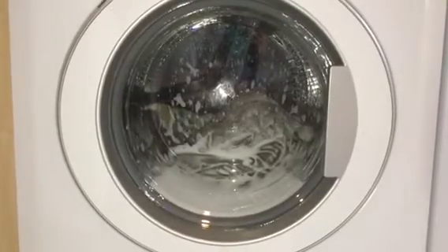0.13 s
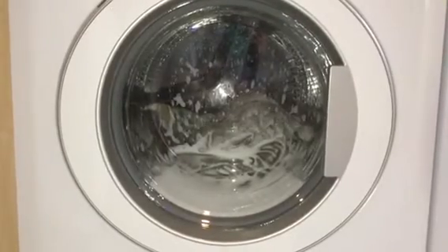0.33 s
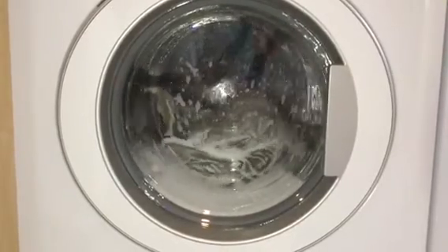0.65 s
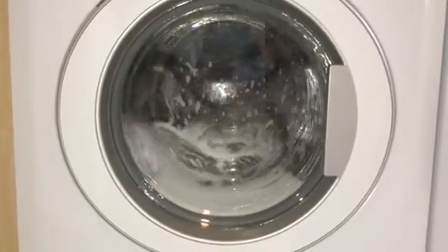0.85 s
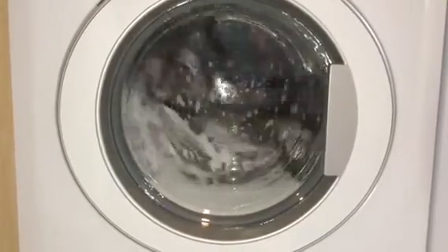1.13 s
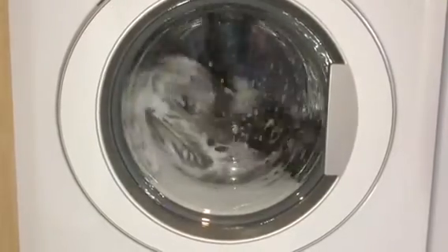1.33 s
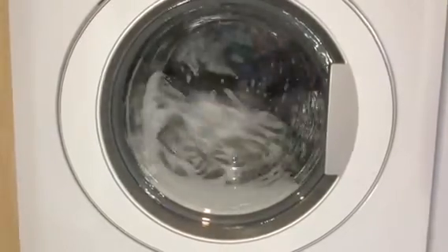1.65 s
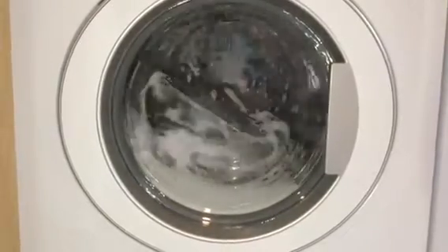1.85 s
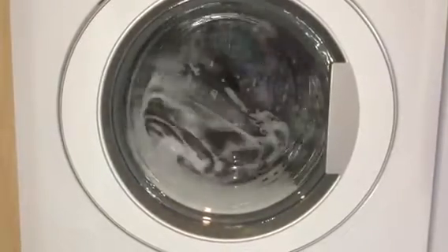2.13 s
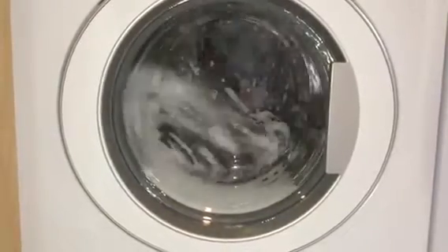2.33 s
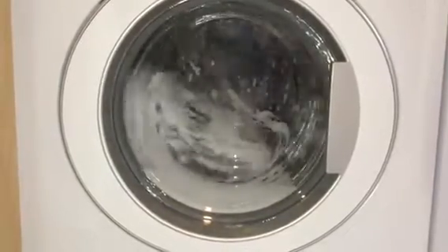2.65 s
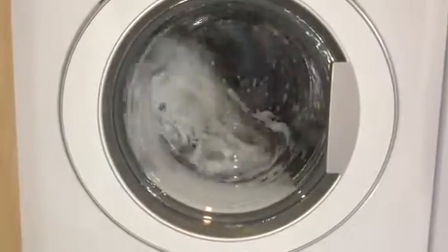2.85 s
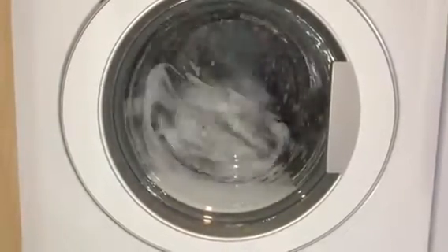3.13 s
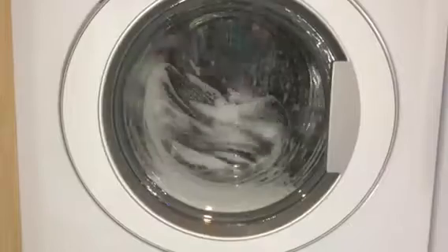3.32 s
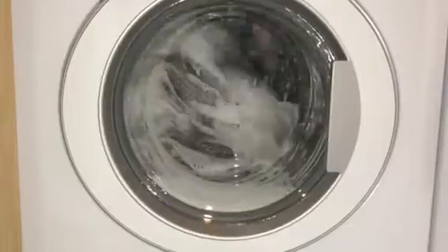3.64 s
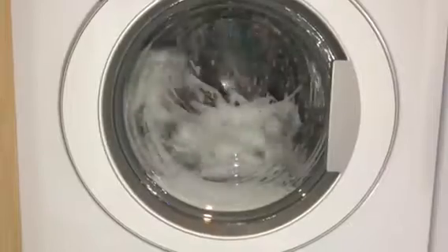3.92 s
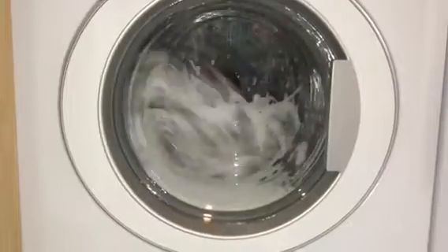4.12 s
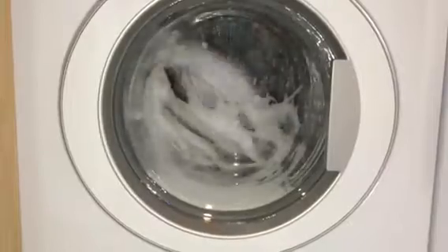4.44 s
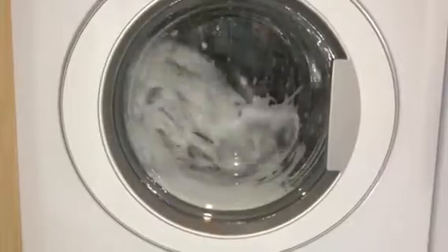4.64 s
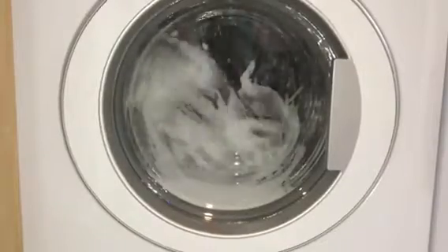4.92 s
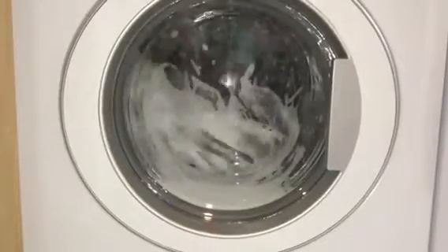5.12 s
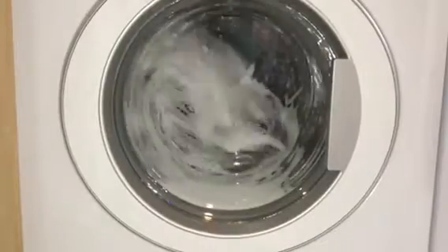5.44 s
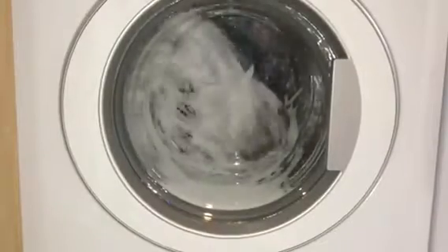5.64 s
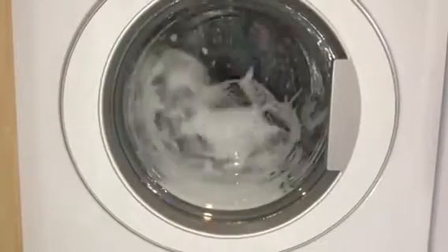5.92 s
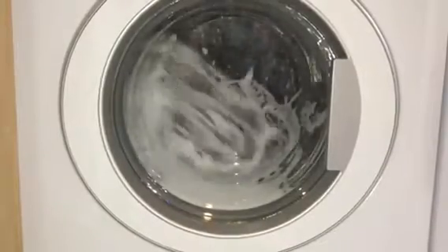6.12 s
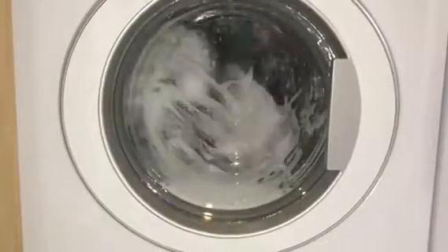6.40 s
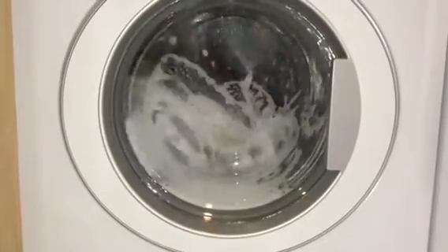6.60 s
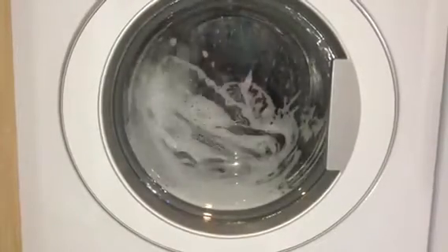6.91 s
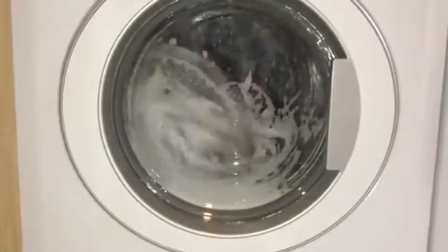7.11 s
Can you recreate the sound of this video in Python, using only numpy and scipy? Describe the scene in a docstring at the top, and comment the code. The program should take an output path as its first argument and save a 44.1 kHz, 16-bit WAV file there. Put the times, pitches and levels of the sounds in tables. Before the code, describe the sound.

A front-loading washing machine starts turning a heavy wet load, with quiet ticks, then irregular hollow thuds, wet slaps and sloshing in a small hard room.

```python
"""Knocks of a wet load in a front-loading washing machine, at the start of a wash turn in a small hard room.
Each fall is a cluster of impacts that excites damped drum and door modes, a cabinet swing and a wet smack.
Thumps are decaying tub oscillations, creaks are harmonics of uneven slips, gulps and drips are gliding notes.
Splashes, sprays and churning are shaped noise; patter and trickle are random trains of short rising notes.
A banded echo, room rumble and microphone hiss lie beneath; the microphone is close to the machine."""
import sys
import numpy as np
from scipy import signal
from scipy.fft import rfft, irfft
from scipy.io import wavfile
from scipy.ndimage import uniform_filter1d

SR = 44100
rng = np.random.default_rng(int(sys.argv[2]) if len(sys.argv) > 2 else 0)


def output_pcm(signal):
    """Save a mono or channel-first signal as 16-bit PCM at the path in sys.argv[1].

    Samples are clipped to [-1, 1] before scaling.
    """
    pcm = np.clip(np.atleast_2d(signal).T, -1, 1) * 32767
    wavfile.write(sys.argv[1], SR, np.round(pcm).astype(np.int16))


N = 320166


def gain_of(db):
    """Level law: decibels to amplitude."""
    return 10 ** (np.asarray(db) / 20)


def evened(x):
    """Power normalization: scales to rms 1."""
    return x / np.sqrt(np.mean(x ** 2) + 1e-20)


def peaked(x):
    """Peak normalization: scales to peak 1."""
    return x / (abs(x).max() + 1e-20)


def blow(x):
    """Energy normalization: scales a short sound to the energy of 10 ms at rms 1."""
    return x * np.sqrt(SR / 100) / (np.linalg.norm(x) + 1e-20)


def read(points, hz):
    """Interpolation of a table on a logarithmic frequency axis."""
    f, value = np.transpose(points)
    return np.interp(np.log(hz + 1), np.log(f + 1), value)


def add(mix, s, sound):
    """Superposition: adds a sound at a moment."""
    part = mix[round(s * SR):][:len(sound)]
    part += sound[:len(part)]


def coloured(x, spectrum):
    """Linear filtering: weights the components of a signal by a spectrum."""
    weights = gain_of(read(spectrum, np.fft.rfftfreq(len(x), 1 / SR)))
    return irfft(rfft(x) * weights, len(x))


def slow_random(shape, size):
    """Low-pass random modulation: white noise averaged twice over size samples, at rms 1."""
    once = uniform_filter1d(rng.standard_normal(shape), size=size)
    return evened(uniform_filter1d(once, size=size))


def random_patches(shape, bands, frames):
    """Correlated fluctuation: random values averaged over neighbouring bands and frames, at rms 1."""
    across = uniform_filter1d(rng.standard_normal(shape), size=bands, axis=0)
    return evened(uniform_filter1d(across, size=frames, axis=1))


def fluttering(shape):
    """Random amplitude modulation: a quick tremble that blurs a note."""
    return 1 + .55 * slow_random(shape, 70)


def noise(spectrum, patchy_db, flicker_db, size=512):
    """Modulated noise: random short-time spectra with drifting patches and a flicker shared by all bands."""
    shape = size // 2 + 1, 4 * N // size + 5
    a, b = rng.standard_normal((2, *shape))
    patches = random_patches(shape, 4, 12)
    flicker = evened(uniform_filter1d(rng.standard_normal(shape[1]), size=10))
    z = (a + 1j * b) * gain_of(patchy_db * patches + flicker_db * flicker)
    modulated = signal.istft(z, nperseg=size, noverlap=3 * size // 4)[1][:N]
    return evened(coloured(modulated, spectrum))


def patchy(x):
    """Time-frequency modulation: breaks a hiss into narrow patches that come and go."""
    z = signal.stft(x, nperseg=256)[2]
    depth_db = 5
    z *= gain_of(depth_db * random_patches(z.shape, 2, 7))
    return signal.istft(z, nperseg=256)[1][:len(x)]


# Room noise and microphone hiss spectra: pitch_hz [Hz], level_db [dB per Hz]
AIR_SPECTRUM = [(12, -47), (20, -12), (85, 0), (1100, -7), (1570, -15), (1670, -9), (1970, -12.5),
                (2430, -15.5), (3000, -21.5), (3900, -26), (6600, -120)]
HISS_SPECTRUM = [(1500, -16), (3000, -2.5), (5000, -3), (7000, -5), (9000, -4), (11000, -5.5), (13500, -6),
                 (15000, -14)]
AIR_DB, HISS_DB, WHINE_DB, WHINE_HZ = -82, -88.5, -103, 9000


def quiet():
    """Stationary noise floor: room noise, microphone hiss and a faint electric whine of narrow-band noise."""
    whine_band = [(WHINE_HZ - 25, -40), (WHINE_HZ, 0), (WHINE_HZ + 25, -40)]
    whine = evened(coloured(rng.standard_normal(N), whine_band))
    hiss = noise(HISS_SPECTRUM, patchy_db=1.5, flicker_db=1.0)
    air = noise(AIR_SPECTRUM, patchy_db=1.5, flicker_db=.6)
    return gain_of(AIR_DB) * air + gain_of(HISS_DB) * hiss + gain_of(WHINE_DB) * whine


# Reverberation time of the room: pitch_hz [Hz], t60_s [s]
ROOM_T60 = [(60, 0.65), (250, 0.27), (700, 0.39), (1100, 0.5), (1600, 0.51), (2500, 0.33), (4000, 0.67),
            (8000, 0.25)]
# Strength of the echo: pitch_hz [Hz], level_db [dB]
ECHO_COLOUR = [(40, -34.5), (100, -3.5), (170, 9), (250, 8), (380, 2.5), (600, -4.5), (1500, -3.5),
               (2300, -6), (4000, -9), (12000, -4)]


def room(x):
    """Reverberation: sparse taps of random sign, each band decaying at its own rate; three tails take turns."""
    out, turn = np.zeros(N), np.pi * np.arange(N) / SR * 1.7
    for k in range(3):
        taps, slots = np.zeros(SR), np.arange(400, SR - 20, 20)
        taps[slots + rng.integers(0, 20, len(slots))] = rng.choice([-1., 1.], len(slots))
        hz, t, z = signal.stft(taps, SR, nperseg=512)
        t60 = read(ROOM_T60, hz)[:, None]
        z *= gain_of(read(ECHO_COLOUR, hz)[:, None] - 60 * t / t60)
        z *= np.sqrt(20 * 6 * np.log(10) / SR / t60)  # energy 1 before the colour
        z *= gain_of(0.49 * random_patches(z.shape, 4, 3))  # random unevenness of the tail
        tail = signal.istft(z, SR, nperseg=512)[1]
        share = np.sqrt(2 / 3) * np.cos(turn + k * np.pi / 3)  # the three powers sum to 1
        out += signal.fftconvolve(x * share, tail)[:N]
    return out


# Churning water and cloth: start_s [s], wash_db [dB], rumble_db [dB]
CHURN_LEVELS = [(0.0, -83, -85.5), (0.69, -77, -69), (0.97, -72.5, -69.5), (1.47, -71, -83.5),
                (1.58, -58, -62), (1.66, -51, -65), (1.78, -66.5, -56), (2.04, -63, -70), (2.75, -62, -67),
                (3.07, -52, -63.5), (3.5, -59.5, -72), (3.75, -49, -57), (4.29, -59.5, -66),
                (4.83, -54.5, -55.5), (4.99, -59, -69.5), (5.24, -55, -55), (5.4, -59, -76),
                (5.84, -58.5, -57), (6.132, -56, -63.5), (7.26, -57.5, -66)]
# Spectra of wash, fine splashing and deep rumble: pitch_hz [Hz], level_db [dB per Hz]
WASH_SPECTRUM = [(59, -34.5), (100, -6.5), (220, -1.5), (255, 3), (327, -11), (451, -9), (486, -15),
                 (605, -8.5), (966, -20), (1190, -26.5), (1710, -38), (2320, -39.5), (3300, -53),
                 (4290, -94), (7260, -120)]
FIZZ_SPECTRUM = [(2000, -9), (3000, 1), (4500, -8), (6500, -11.5), (9000, -31.5)]
RUMBLE_SPECTRUM = [(12, -52), (30, -18), (70, -1), (103, -14), (130, 0), (170, -17.5), (290, -120)]
FIZZ_DB = -38.5  # re the wash
SURGE_DB, SURGE_RISE_S, SURGE_T60_S = -25, 0.031, 0.33  # dB re the drum, before rise and decay


def churn():
    """Turbulent noise: a wash with fine splashing that heaves after each blow, and a turning-drum rumble."""
    s, wash_db, rumble_db = np.transpose(CHURN_LEVELS)
    t = np.arange(N) / SR
    level = gain_of(np.interp(t, s, wash_db))
    for blow_s, drum_db, *_ in KNOCKS:
        surge = gain_of(drum_db + SURGE_DB - 60 * t[:SR] / SURGE_T60_S)
        add(level, blow_s, surge * np.minimum(t[:SR] / SURGE_RISE_S, 1))
    wash = noise(WASH_SPECTRUM, patchy_db=1.5, flicker_db=2.5)
    wash = wash + gain_of(FIZZ_DB) * noise(FIZZ_SPECTRUM, patchy_db=1.5, flicker_db=4.5)
    rumble = noise(RUMBLE_SPECTRUM, patchy_db=2.5, flicker_db=2.5, size=1024)
    return level * wash + gain_of(np.interp(t, s, rumble_db)) * rumble


# Water running down the drum wall: start_s [s], level_db [dB]
TRICKLE_LEVELS = [(0.0, -89.5), (1.54, -95), (1.68, -92), (2.12, -89), (3.09, -75.5), (3.34, -81),
                  (3.5, -76.5), (3.72, -76), (4.2, -81), (4.45, -85), (4.63, -66), (4.79, -80),
                  (5.68, -88.5), (6.09, -82.5), (6.49, -76.5), (7.26, -88)]
# Strength of its drops: pitch_hz [Hz], level_db [dB]
TRICKLE_TONE = [(1200, 6), (2000, 0), (2800, -12.5), (4500, -19)]
TRICKLE_PER_S = 290  # drops a second, about the average


def trickle():
    """Clustered random process: many small drops, each a few decaying cycles of rising pitch."""
    s, db = np.transpose(TRICKLE_LEVELS)
    clumps = gain_of(6 * slow_random(N, 900)) / 1.3  # mean near 1
    size = gain_of(3. * np.minimum(rng.exponential(1, N), 3))
    size = size * (rng.random(N) < TRICKLE_PER_S * clumps / SR)
    kind, t, out = rng.integers(0, 30, N), np.arange(1500) / SR, np.zeros(N)
    for k, hz in enumerate(np.geomspace(1200, 4500, 30)):
        turns = hz * t
        drop = turns * np.exp(-turns / 5.0) * np.sin(2 * np.pi * turns * (1 + 0.0013 * turns))
        drop = gain_of(read(TRICKLE_TONE, hz)) * drop / np.linalg.norm(drop)
        out += signal.oaconvolve(size * (kind == k), drop)[:N]
    return gain_of(np.interp(np.arange(N) / SR, s, db)) * evened(out)


# Drips ringing inside the drum: start_s [s], level_db [dB], pitch_hz [Hz], length_s [s]
DRIPS = [(5.117, -83, 3950, 0.021), (5.158, -80, 3880, .025), (5.181, -86, 3600, 0.062),
         (5.186, -77, 2700, .035), (5.245, -81, 4300, 0.025), (5.3, -84, 3800, .025),
         (5.44, -86, 4870, 0.056), (5.517, -83, 4450, 0.028), (5.519, -78.5, 2280, 0.033),
         (5.582, -87, 3600, 0.022), (5.93, -72, 2060, 0.039), (6.968, -84, 2830, 0.025)]
DRIP_RISE = 0.019  # fraction of the pitch gained over a drip


def drips():
    """Bubble resonance: a small bubble rings one unsteady note that rises a little and dies."""
    out = np.zeros(N)
    for s, db, hz, length in DRIPS:
        u = np.linspace(0, 1, round(length * SR))
        wobble = .4 * uniform_filter1d(rng.standard_normal(len(u)), size=200)
        note = np.sin(2 * np.pi * np.cumsum(hz * (1 + DRIP_RISE * u + wobble)) / SR)
        add(out, s, gain_of(db) * np.sin(np.pi * np.sqrt(u)) ** 2 * fluttering(len(u)) * note)
    return out


# Strength of the pats after a blow: pitch_hz [Hz], level_db [dB]
PATTER_TONE = [(250, -1.5), (600, -0.5), (1200, -6.5), (2000, -23.5), (3000, -38.5)]
PATTER_DB, PATTER_PER_S, PATTER_T60_S = -19.5, 210, 0.53  # dB re the drum, before rise and decay


def patter():
    """Random impact train: cloth and water keep falling after each blow in short pats, a few of them large."""
    level, t, out = np.zeros(N), np.arange(SR) / SR, np.zeros(N)
    for s, drum_db, *_ in KNOCKS:
        decay = gain_of(drum_db + PATTER_DB - 60 * t / PATTER_T60_S)
        add(level, s, decay * np.minimum(t / 0.053, 1))
    size = gain_of(4. * np.minimum(rng.exponential(1, N), 4)) * (rng.random(N) < PATTER_PER_S / SR)
    kind = rng.integers(0, 24, N)
    for k, hz in enumerate(np.geomspace(250, 3000, 24)):
        turns = hz * t[:1500]
        pat = turns * np.exp(-turns / 1.47) * np.sin(2 * np.pi * turns * (1 + .02 * turns))
        pat = gain_of(read(PATTER_TONE, hz)) * pat / np.linalg.norm(pat)
        out += signal.oaconvolve(size * (kind == k), pat)[:N]
    return level * evened(out)


# Spray thrown on the door glass: start_s [s], level_db [dB before rise and decay]
SPRAYS = [(0.782, -59), (2.156, -64), (2.635, -49.5), (2.678, -54), (2.858, -56.5), (2.897, -42.5),
          (3.23, -59), (3.374, -53.5), (3.54, -57), (3.588, -47), (4.085, -58.5), (4.221, -54),
          (4.437, -51.5), (4.648, -48), (4.733, -51), (4.759, -54.5), (5.037, -59), (5.399, -60),
          (5.872, -63), (6.111, -47.5), (6.252, -56), (6.389, -57), (6.545, -51), (6.698, -60)]
# Its spectrum: pitch_hz [Hz], level_db [dB per Hz]
SPRAY_SPECTRUM = [(1200, -27), (2400, 15), (3300, -6.5), (5000, -4.5), (7000, -7.5), (9400, -6.5),
                  (13000, -10.5), (15000, -22)]
SPRAY_RISE_S, SPRAY_T60_S = .009, 0.093


def sprays():
    """Decaying noise bursts: short puffs of fine hiss."""
    out, t = np.zeros(N), np.arange(8192) / SR
    for s, db in SPRAYS:
        hiss = peaked(patchy(coloured(rng.standard_normal(8192), SPRAY_SPECTRUM)))
        add(out, s, gain_of(db - 60 * t / SPRAY_T60_S) * np.minimum(t / SPRAY_RISE_S, 1) * hiss)
    return out


# Water thrown up by a blow: start_s [s], level_db [dB before rise and decay], t60_s [s]
SPLASHES = [(0.5225, -68.5, 0.23), (0.6464, -79, 0.21), (0.7795, -70, 0.2), (0.9014, -83, 0.23),
            (1.602, -81, 0.25), (1.6531, -77, 0.2), (1.704, -78, 0.19), (2.1585, -79, 0.25),
            (2.4223, -79, 0.49), (2.492, -60.5, 0.27), (2.8546, -68, 0.26), (2.8974, -46, 0.19),
            (3.2674, -78, 0.22), (3.515, -67.5, 0.25), (3.5409, -56.5, 0.35), (3.956, -75, 0.25),
            (4.0674, -71, 0.28), (4.398, -73, 0.28), (4.4344, -54, 0.28), (4.6471, -58.5, 0.25),
            (5.0312, -77, 0.25), (5.1592, -78, 0.27), (5.2634, -71, 0.21), (5.387, -72, 0.25),
            (5.518, -74, 0.25), (5.7214, -77, 0.23), (5.8714, -74, 0.25), (5.9044, -74, 0.25),
            (6.2549, -53.5, 0.17), (6.5524, -57.5, 0.25), (6.5807, -66, 0.36), (6.9632, -74, 0.18)]
# Its spectrum: pitch_hz [Hz], level_db [dB per Hz]
SPLASH_SPECTRUM = [(900, -10), (1800, 0.5), (2600, 6), (3100, -5), (3600, -5.5), (4000, -12), (4400, -6),
                   (4900, -9.5), (5350, -8.5), (6000, -16.5), (8000, -25.5), (15000, -31)]
SPLASH_RISE_S = .006


def splashes():
    """Exponentially decaying noise: wet spatter bursts with a blow and thins out."""
    out, t = np.zeros(N), np.arange(12288) / SR
    for s, db, t60 in SPLASHES:
        spatter = evened(patchy(coloured(rng.standard_normal(len(t)), SPLASH_SPECTRUM)))
        spatter = spatter / np.sqrt(2)  # the power of a sine of peak 1
        add(out, s, gain_of(db - 60 * t / t60) * np.minimum(t / SPLASH_RISE_S, 1) * spatter)
    return out


# Gulps, and at 6.568 s a drum ring near 600 Hz:
# start_s [s], level_db [dB], first_hz [Hz], last_hz [Hz], length_s [s]
GULPS = [(0.381, -63.5, 440, 292, 0.037), (0.987, -66.5, 687, 566, 0.033), (1.012, -66.5, 428, 294, 0.047),
         (1.508, -59, 800, 550, 0.047), (3.759, -46.5, 417, 592, 0.059), (5.647, -42.5, 292, 245, 0.03),
         (6.568, -28.5, 643.6, 594, 0.064), (6.927, -45, 445, 674, 0.086)]


def gulps():
    """Frequency and amplitude modulation: a gliding, unsteady resonant note."""
    out = np.zeros(N)
    for s, db, first_hz, last_hz, length in GULPS:
        count = round(length * SR)
        turns = np.cumsum(np.geomspace(first_hz, last_hz, count)) / SR
        a, b = .35 * slow_random((2, count), 150)
        note = (1 + a) * np.sin(2 * np.pi * turns) + b * np.cos(2 * np.pi * turns)
        add(out, s, gain_of(db) * peaked(note) * signal.windows.tukey(count, .7))
    return out


# Suspension creaks: start_s [s], level_db [dB], slip_hz [Hz], length_s [s], loudest_hz [Hz]
CREAKS = [(2.003, -68.5, 714, 0.032, 2080), (2.365, -62.5, 695, 0.057, 2270),
          (3.218, -61.5, 682, 0.06, 2680), (3.945, -62.5, 680, 0.19, 2060), (4.608, -58, 727, 0.07, 2050),
          (5.004, -60, 662, 0.032, 2280), (5.115, -68, 685, 0.028, 2390), (5.142, -65, 686, 0.048, 2100),
          (5.245, -66.5, 698, .04, 2750), (5.386, -72, 693, 0.02, 2400), (5.564, -57.5, 512, 0.04, 1510),
          (5.822, -61, 706, 0.024, 2100), (5.865, -68, 700, 0.023, 2800), (6.937, -73, 682, 0.067, 2050),
          (6.95, -69, 693, 0.029, 2760), (7.08, -70, 677, 0.027, 2730)]
CREAK_NARROW_DB = -100  # fall away from the loudest harmonic: dB per squared octave


def creaks():
    """Stick-slip: quick uneven slips give a short stack of harmonics, of which one or two stand out."""
    out, k = np.zeros(N), np.arange(2, 9)[:, None]
    for s, db, hz, length, loudest_hz in CREAKS:
        t = np.arange(round(length * SR)) / SR
        wander = .35 * uniform_filter1d(rng.standard_normal(len(t)), size=300)
        turns = np.cumsum(hz * (1 + wander)) / SR
        weight_db = np.maximum(CREAK_NARROW_DB * np.log2(k * hz / loudest_hz) ** 2, -32)
        weight = gain_of(weight_db + 2 * rng.standard_normal((7, 1)))
        uneven = gain_of(3 * evened(uniform_filter1d(rng.standard_normal((7, len(t))), size=250)))
        harmonics = weight * uneven * fluttering((7, len(t))) * np.sin(2 * np.pi * k * turns)
        add(out, s, gain_of(db) * peaked(harmonics.sum(0)) * np.sin(np.pi * np.sqrt(t / t[-1])) ** 2)
    return out


# Soft falls that shake the tub: start_s [s], level_db [dB before rise and decay], pitch_hz [Hz]
THUMPS = [(2.357, -36, 118), (2.495, -37.5, 114.5), (2.913, -24.5, 118), (3.271, -28.5, 100.6),
          (3.292, -29.5, 78.5), (3.548, -54, 103), (4.441, -54, 98.6), (4.648, -74, 112),
          (4.876, -35.5, 75), (5.16, -38, 79), (5.269, -40, 78), (6.273, -37, 113), (6.58, -43.5, 116),
          (6.997, -42, 55)]
THUMP_RISE_S, THUMP_T60_S = 0.013, 0.067


def thumps():
    """Damped mass on springs: the tub swings a few slow cycles."""
    out, t = np.zeros(N), np.arange(12000) / SR
    rise = np.sin(np.pi / 2 * np.minimum(t / THUMP_RISE_S, 1)) ** 2
    for s, db, hz in THUMPS:
        add(out, s, gain_of(db - 60 * t / THUMP_T60_S) * rise * np.sin(2 * np.pi * hz * t))
    return out


def ring(modes, push, place_db):
    """Modal excitation: overlapping stages of the push ring modes with freshly drawn weights and tunings."""
    hz, damping, db = np.transpose(modes)[:, :, None]
    t, out = np.arange(3072) / SR, 0
    decay = 2 * np.pi * damping * t
    swing = decay * np.exp(-decay)  # damped panels swell, then die
    stage = np.clip((np.arange(len(push)) / SR - .025) / .018, 0, 3)
    for k, chance in enumerate(rng.standard_normal((4, 2, len(modes), 1))):
        weight = gain_of(db + place_db(hz) + 2.8 * chance[0])
        rings = weight * swing * np.sin(2 * np.pi * hz * (1 + .035 * chance[1]) * t)
        share = np.sqrt(np.maximum(1 - abs(stage - k), 0))
        out = out + signal.fftconvolve(rings.sum(0), push * share)
    return blow(out)


# Modes of drum and door: pitch_hz [Hz], damping_hz [Hz, decay rate over 2 pi], level_db [dB]
DRUM_MODES = [(151, 540, -30), (185, 29, -5), (260.5, 64, 1), (383.6, 74, 1.5), (463, 38.4, -5.5),
              (545, 40, -13.5), (609.7, 81.3, 4.5), (682, 39.4, -9), (742, 44, -8), (820.6, 96, -0.5),
              (933, 103, 0.5), (1107, 110, -6.5), (1144, 62, -10.5), (1297, 87, -3.5), (1475, 120, -18),
              (1757, 81, -16.5)]
DOOR_MODES = [(1428, 59, 2), (1457, 140, 6), (1580, 190, -2), (1713, 220, 7.5), (1970, 172, 6.5),
              (2200, 62, -9.5), (2415, 310, -2), (2380, 820, -18), (2700, 240, -10.5), (3250, 940, 3),
              (3070, 580, -13.5)]
# First wet contact: pitch_hz [Hz], level_db [dB per Hz]
SMACK_SPECTRUM = [(200, -24), (500, 6.5), (900, 14), (1500, -7.5), (2400, -17.5), (3200, -45),
                  (6000, -73.5)]
# Blows of the load: start_s [s], drum_db [dB], drum_hz [Hz, middle of the modes struck], cabinet_db [dB],
# cabinet_hz [Hz], door_db [dB], contact_ms [ms]; levels are rms over 10 ms
KNOCKS = [(0.399, -87, 470, -58.5, 171, -84, 4.8), (0.522, -65, 1030, -43.5, 223, -65, 7.6),
          (0.646, -65.5, 1150, -52.5, 207, -66.5, 13), (0.779, -65, 1020, -42, 224, -66, 14),
          (0.902, -66, 860, -55, 204, -78, 15), (1.038, -85, 580, -59, 169, -95, 18),
          (1.063, -81, 580, -61.5, 203, -90, 18), (1.105, -75, 800, -70, 235, -81, 40),
          (1.15, -68, 650, -67, 150, -74, 35), (1.205, -68.5, 700, -62.5, 175, -84, 27),
          (1.464, -79, 603, -62.5, 215, -93, 9.2), (1.485, -72, 684, -56, 219, -79, 21),
          (1.515, -55.5, 510, -57.5, 326, -82, 3.7), (1.584, -64, 500, -44, 163, -89, 11),
          (1.602, -47.5, 1030, -47, 156, -82, 16), (1.626, -55, 1200, -43.5, 169, -64, 17),
          (1.653, -53.5, 1290, -54, 171, -62, 3.1), (1.678, -50, 705, -48, 167, -80, 9.4),
          (1.706, -47.5, 700, -41.5, 167, -55, 4.8), (2.157, -59, 544, -52, 231, -77.5, 3),
          (2.224, -69, 542, -54.5, 272, -77, 6.3), (2.421, -60.5, 573, -49, 236, -72, 3.6),
          (2.491, -27.5, 760, -31.5, 238, -38.5, 4.9), (2.652, -45, 630, -49.5, 288, -58, 6.1),
          (2.856, -67, 830, -44, 235, -63.5, 7.9), (2.892, -29.5, 910, -43, 204, -35.5, 5.3),
          (2.898, -26, 660, -53, 199, -33, 6.6), (3.159, -49.5, 835, -45.5, 243, -87, 18),
          (3.268, -55.5, 599, -40.5, 127.7, -66, 21), (3.514, -37.5, 514, -40, 264, -65, 28),
          (3.54, -28.5, 610, -32, 250, -45.5, 28.4), (3.754, -38.5, 485, -42, 185, -83, 45),
          (3.853, -47, 950, -42.5, 266, -75, 3.7), (3.957, -61, 527, -64, 260, -62, 37),
          (4.068, -56, 683, -60, 223, -65, 8.5), (4.228, -60, 600, -51.5, 216.7, -69, 17),
          (4.314, -53.5, 595, -57, 156, -73, 8.8), (4.398, -47.5, 514, -44.5, 215, -60, 6.9),
          (4.433, -35.5, 930, -58, 196, -43, 1.9), (4.439, -26, 826, -32.5, 166.6, -41, 4.4),
          (4.644, -29, 780, -23.5, 231.7, -47.5, 5.9), (4.654, -27.5, 700, -28, 239, -50, 8.7),
          (4.81, -48.5, 620, -62, 151, -79, 16), (5.033, -55.5, 446, -68, 240, -68, 2.9),
          (5.158, -53.5, 504, -57, 253, -65, 20), (5.18, -54, 630, -51, 217, -69, 2.3),
          (5.264, -58.5, 598, -47, 253, -64, 9.9), (5.388, -68, 900, -61, 230, -77, 22),
          (5.519, -66.5, 616, -50.5, 213, -80, 9.2), (5.651, -58.5, 460, -38.5, 190, -85, 2.1),
          (5.676, -70, 462, -42, 174, -87, 5), (5.704, -64, 700, -63, 200, -76, 3.4),
          (5.722, -54.5, 650, -69, 183, -66, 11), (5.873, -55, 530, -49.5, 252, -65.5, 21),
          (5.905, -48, 540, -50, 255, -66, 44), (5.95, -66, 656, -48.5, 179, -80, 14),
          (6.255, -39.5, 884, -40, 163, -44, 5.5), (6.29, -52.5, 495, -45, 240, -60, 12),
          (6.549, -37.5, 797, -54, 248, -43, 4.4), (6.556, -25, 880, -36.5, 267, -42.5, 20.4),
          (6.582, -36, 650, -37, 271, -57, 12), (6.652, -55, 582, -52.5, 298, -57, 20),
          (6.843, -56, 655, -57.5, 196, -74, 20), (6.924, -49, 520, -46.5, 236, -74, 27),
          (6.964, -47, 620, -47, 162, -68, 5.5), (7.027, -54, 656, -71, 248, -73, 4.6),
          (7.131, -60, 636, -51, 244, -81, 20)]
HEAVY_DB = -25  # drum level of a full fall of the load
BUILD_MS, BUILD_MS_PER_DB = 2.2, -.1  # a full fall builds up this long, lighter blows slower
SMACK_DB, SMACK_SLOPE, SMACK_MS = -2, .4, 2.45  # dB re the drum in a full fall, dB per dB, dying time
RAGGED_DB = 4  # the rest of the load lands in lumps
DOOR_LINGER_MS = 61  # the door keeps rattling: its share of the push grows by one in this time
SWELL_MS = 14  # the cabinet reaches its widest swing


def knocks():
    """Impact excitation: wet cloth lands as a cluster of impacts; the heavy cabinet swings a little later."""
    slaps, swings, ms = np.zeros(N), np.zeros(N), np.arange(4096) * 1000 / SR - 20
    after = np.maximum(ms - 2.5, 0)
    for s, drum_db, drum_hz, cabinet_db, cabinet_hz, door_db, contact_ms in KNOCKS:
        over_db = drum_db - HEAVY_DB
        rise = np.minimum(np.exp((ms - 2.5) / (BUILD_MS + BUILD_MS_PER_DB * over_db)), 1)
        lumps = gain_of(RAGGED_DB * slow_random(4096, 200))
        rest = 0.17 * lumps * np.minimum(after / 14, 1) * np.exp(-after / 78.0)  # the rest follows
        force = rise * (np.exp(-after / np.minimum(contact_ms, 40)) + rest)
        force = force * np.minimum((ms[-1] - ms) / 25, 1) + 1e-9  # fade out at the end of the buffer
        spectrum = rfft(force * rng.standard_normal(4096))
        flat = irfft(spectrum / abs(spectrum))  # flatten the random spectrum
        push = uniform_filter1d(flat * np.sqrt(rise * force), size=8)  # soft contacts carry little treble

        drum = ring(DRUM_MODES, push, lambda hz: -4. * np.log2(hz / drum_hz) ** 2)
        door = ring(DOOR_MODES, push * (1 + after / DOOR_LINGER_MS), lambda hz: 0)
        contact = rng.standard_normal(4096) * rise ** 3 * np.exp(-after / SMACK_MS)
        smack = blow(coloured(contact, SMACK_SPECTRUM))
        smack_db = drum_db + SMACK_DB + SMACK_SLOPE * over_db  # lighter blows smack less
        add(slaps, s - .02, gain_of(drum_db) * drum + gain_of(door_db) * door)
        add(slaps, s - .02, gain_of(smack_db) * smack)

        u = np.maximum(ms, 0) / SWELL_MS
        cycles = cabinet_hz * ms / 1000 + rng.random()
        swing = u ** 3 * np.exp(-1.5 * u ** 2) * np.sin(2 * np.pi * cycles)
        add(swings, s - .02, gain_of(cabinet_db) * blow(swing))
    return slaps, swings


CABINET_ECHO_DB, THUMP_ECHO_DB = -20, -4  # sent to the room: both are heard mostly from close by


def scene():
    """Superposition of direct sound, reverberation and background."""
    slaps, swings = knocks()
    tub = thumps()
    blows = slaps + splashes() + sprays() + creaks() + gulps() + drips() + patter() + trickle()
    echo = room(blows + gain_of(CABINET_ECHO_DB) * swings + gain_of(THUMP_ECHO_DB) * tub)
    return (blows + swings + tub + echo + churn() + quiet())[None]


OVERLOAD, EDGE_HZ = .19, 15250  # full-scale amplitude that rounded peaks approach; upper band limit


def record(dry):
    """Band limiting and soft saturation: deep bass is lost, peaks are rounded, then the treble is cut."""
    thin = signal.sosfilt(signal.butter(2, 45, "high", fs=SR, output="sos"), dry)
    rounded = OVERLOAD * np.tanh(thin / OVERLOAD)
    band_limit = signal.firwin(511, EDGE_HZ, window=("kaiser", 9), fs=SR)[None]
    return signal.oaconvolve(rounded, band_limit, "same")


dry = scene()
out = record(dry)
output_pcm(out)
```